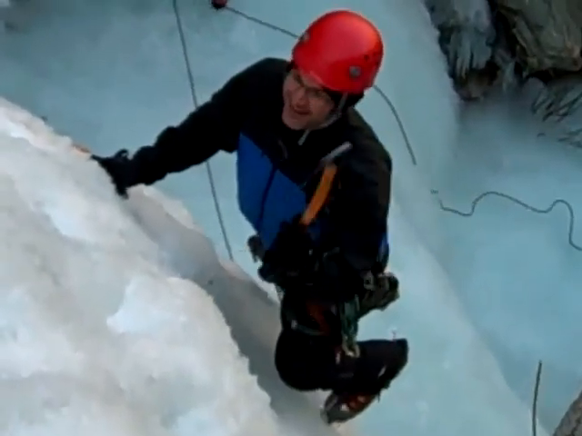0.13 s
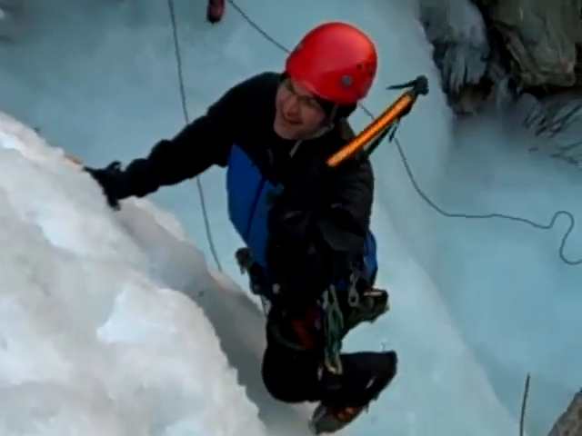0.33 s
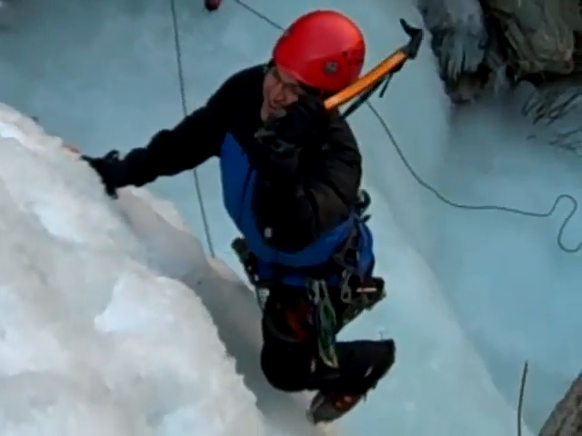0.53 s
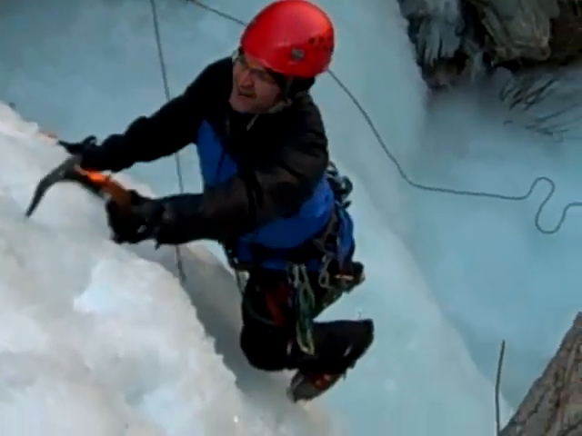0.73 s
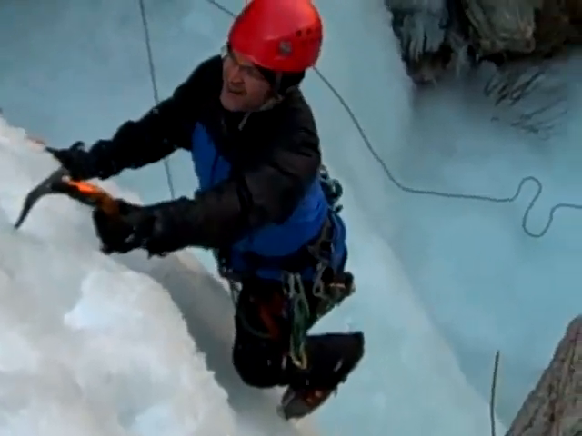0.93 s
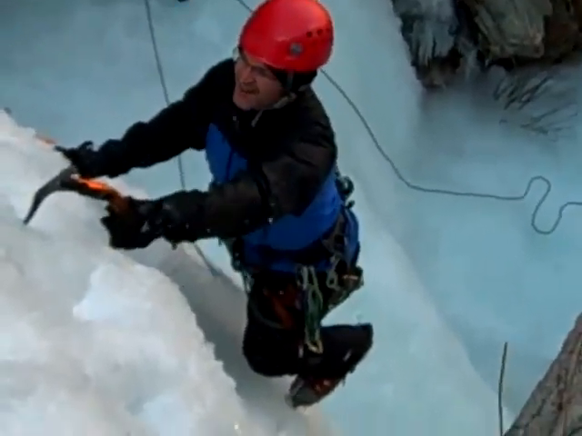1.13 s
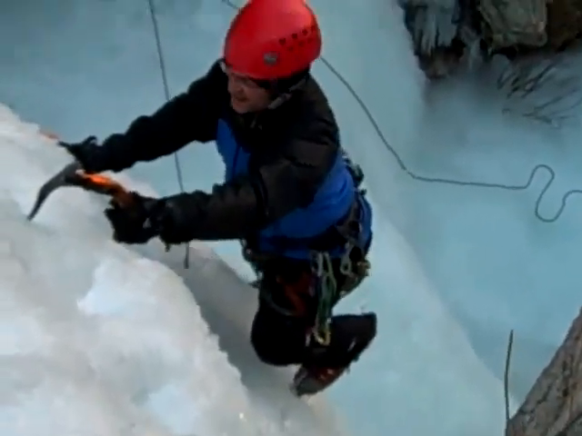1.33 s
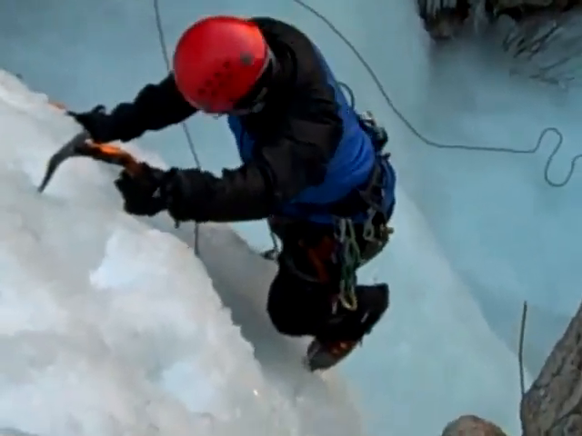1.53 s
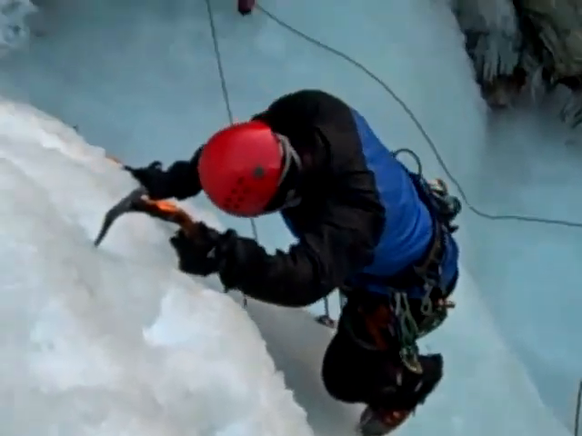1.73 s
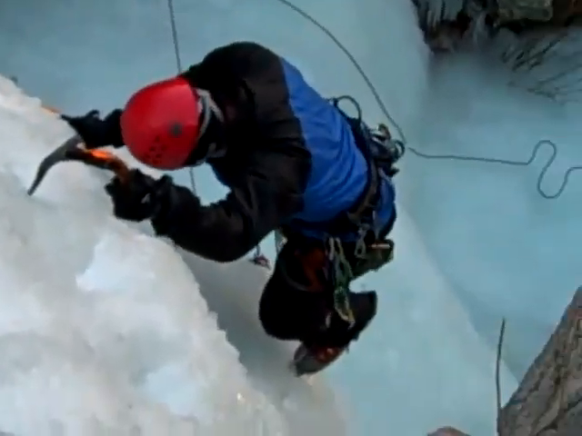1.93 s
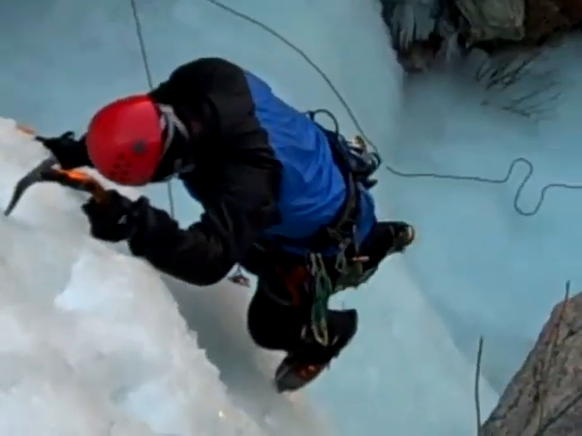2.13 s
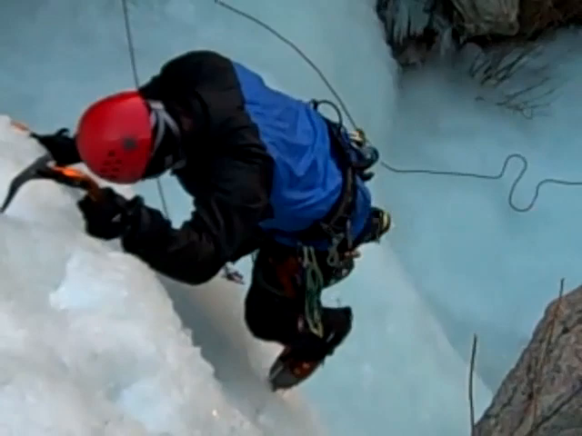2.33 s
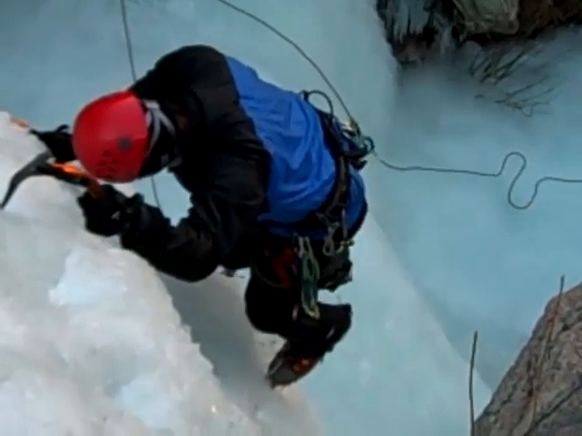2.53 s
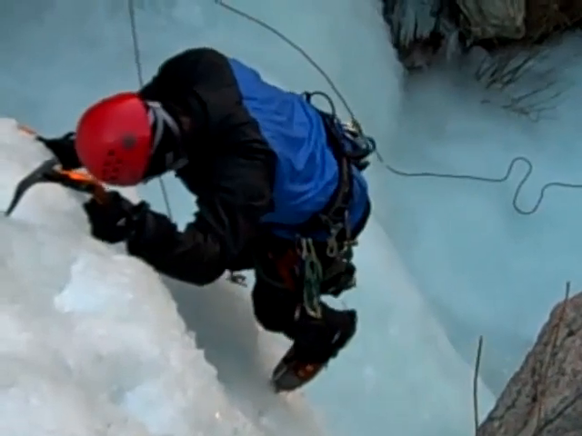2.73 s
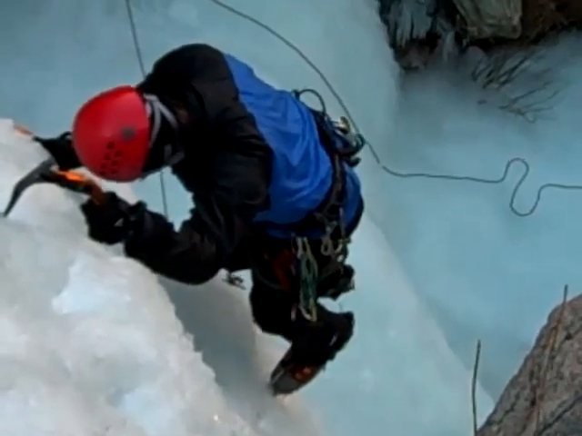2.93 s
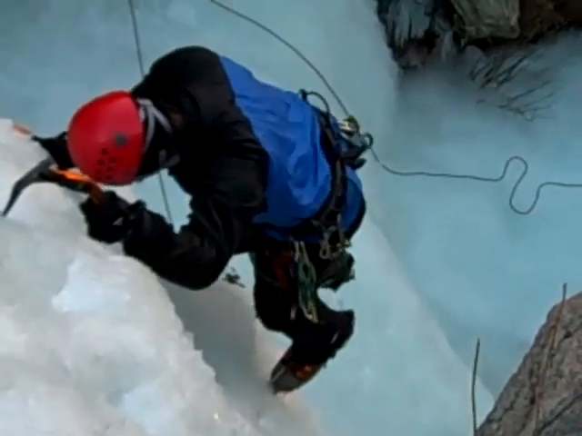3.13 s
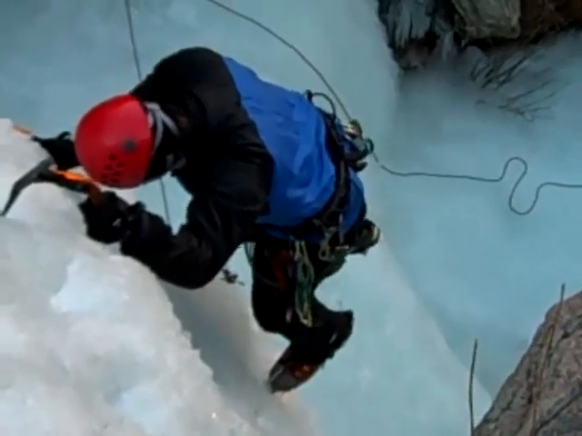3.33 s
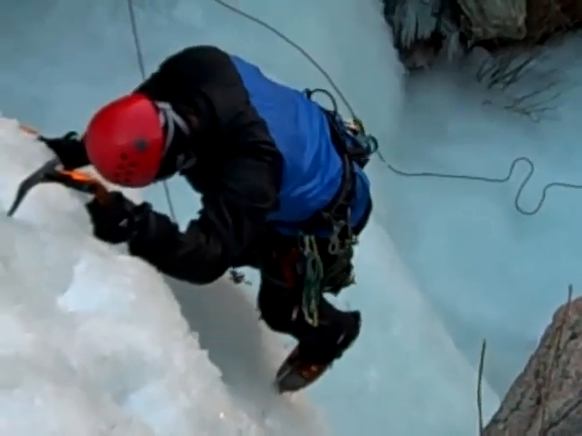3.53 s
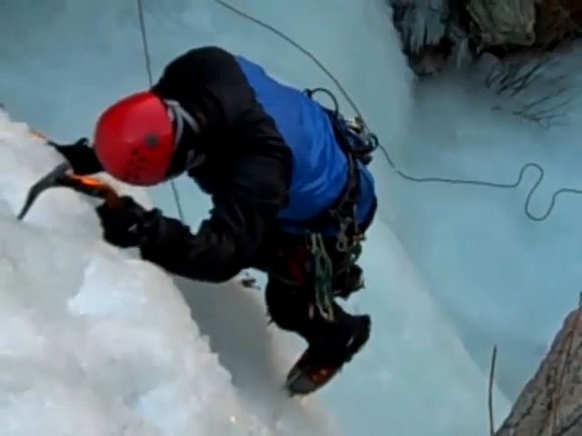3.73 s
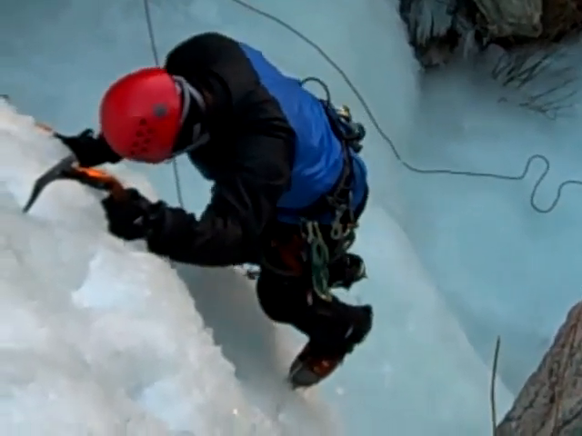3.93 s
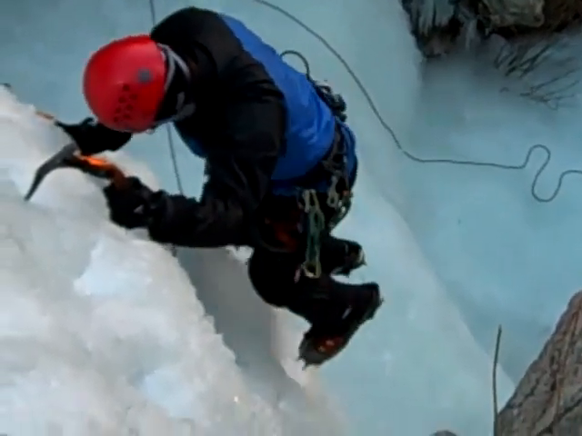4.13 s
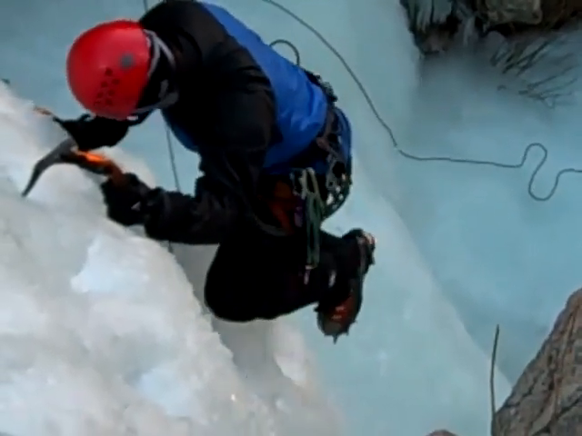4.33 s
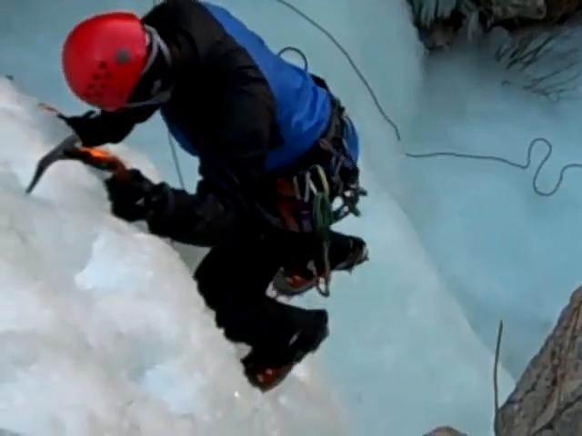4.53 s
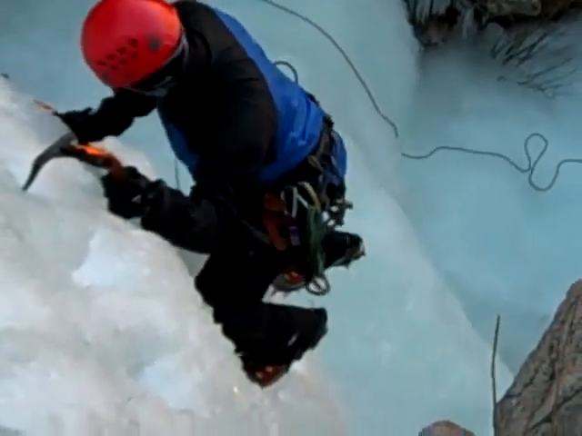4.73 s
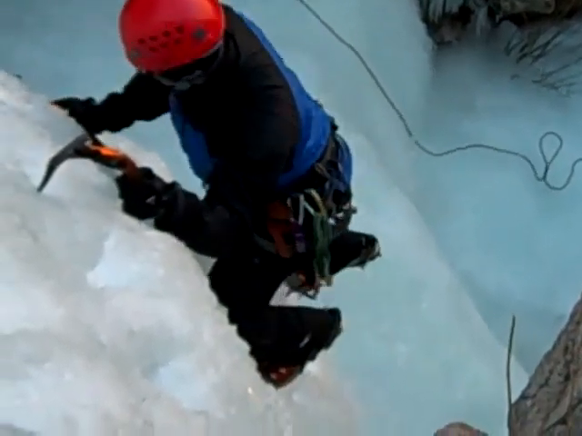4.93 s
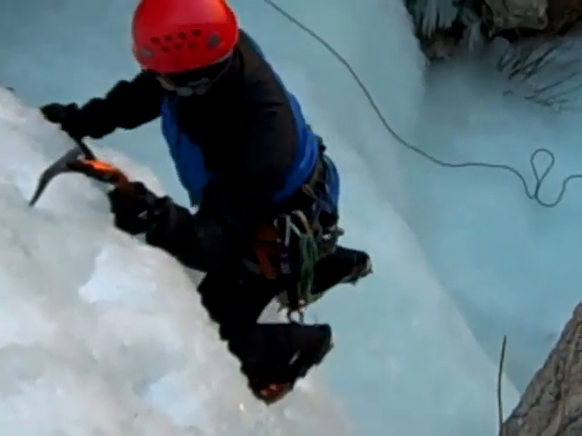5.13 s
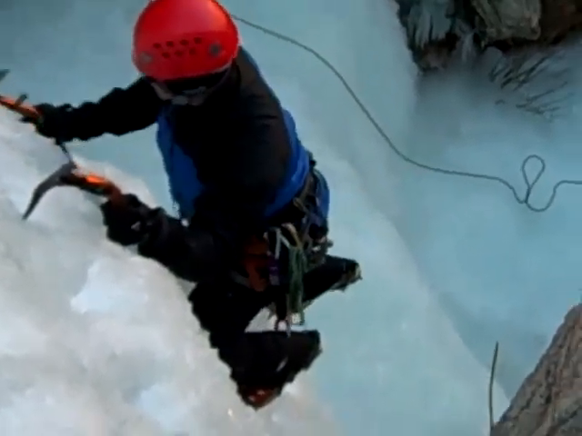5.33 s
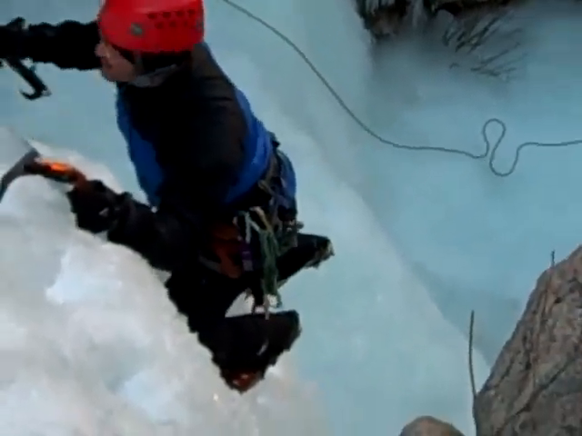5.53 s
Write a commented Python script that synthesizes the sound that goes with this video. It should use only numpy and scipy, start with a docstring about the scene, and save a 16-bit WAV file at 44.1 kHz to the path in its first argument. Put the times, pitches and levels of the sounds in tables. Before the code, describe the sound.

A climber works up a frozen waterfall a few metres below the microphone. A thin steel clink comes first, then an ice axe bites with one sharp, tight crunch. Four crampon kicks follow about a second apart, each crushing ice and loosening small chips. Clothing rustles softly and carabiners jingle once near the end. The gully walls return short echoes over a faint hiss and drip of meltwater.

```python
"""An ice axe bites into a frozen waterfall, then the climber kicks crampons in, a few metres below us.
Each blow crushes ice in a burst of tiny cracks; steel gear clinks, chips fall and clothes rustle.
The gully walls throw the blows back, over the faint hiss and drip of meltwater."""
import sys
import numpy as np
from scipy import signal
from scipy.fft import rfft, irfft
from scipy.io import wavfile

SR = 44100
rng = np.random.default_rng(int(sys.argv[2]) if len(sys.argv) > 2 else 0)


def wrap_up_sound(samples):
    """Save the sound to the file named by the first command line argument, as 16-bit audio."""
    columns = np.atleast_2d(samples).T
    # keep every value between -1 and 1, then stretch to whole-number steps
    tamed = np.clip(columns, -1, 1)
    steps = np.round(tamed * 32767).astype(np.int16)
    wavfile.write(sys.argv[1], SR, steps)


N = 246519
TIME = np.arange(N) / SR

# Crampon kicks. Each row: start in seconds, bite level in dB, rise in seconds, treble in dB,
# level of the boot sinking in, in dB.
KICKS = [(2.6004, -24.5, 0.0034, 2.5, -30), (3.6040, -27, 0.0033, 2, -26.5),
         (4.6925, -28.5, .0105, -3, -56), (5.473, -30.5, 0.0013, -2.5, -44)]
# The tone of ice crunching under a boot. Each row: frequency in Hz, level in dB.
CRUNCH_COLOUR = [(60, -27), (120, -13.5), (200, -9.5), (420, 2.5), (600, -2), (1400, 2.5), (2200, -1),
                 (2700, -2.5), (3600, -1), (6000, -8), (8000, -5), (14000, -5.5), (16000, -4)]


def undb(db):
    """Decibels to gain."""
    return 10 ** (np.asarray(db) / 20)


def unit(x):
    """Scale to rms 1."""
    return x / np.sqrt(np.mean(x ** 2))


def add(track, s, x):
    """Mix x into the track at s seconds."""
    i = max(int(s * SR), 0)
    track[i:i + len(x)] += x[:max(N - i, 0)]


def colour(x, points, bass_db=0, treble_db=0, size=2048):
    """Unit-power EQ through (Hz, dB) points, with a bass and a treble shelf."""
    f = np.arange(size // 2 + 1) * SR / size + 1
    hz, db = np.transpose(points)
    curve_db = np.interp(np.log(f), np.log(hz), db)
    curve_db += bass_db / (1 + (f / 700) ** 3) + treble_db / (1 + (4000 / f) ** 3)
    # Minimum phase keeps attacks sharp: nothing rings ahead of a hit.
    cepstrum = irfft(np.log(unit(undb(curve_db))))
    cepstrum[1:size // 2] *= 2
    cepstrum[size // 2 + 1:] = 0
    impulse = irfft(np.exp(rfft(cepstrum, size)))
    return signal.fftconvolve(x, impulse)[:len(x)]


def crackle(n, rate, spread_db):
    """Tiny cracks of uneven size, about `rate` a second, at rms 1."""
    size = undb(spread_db * np.minimum(rng.exponential(size=n), 5))
    return unit((rng.random(n) < rate / SR) * size * rng.choice([-1, 1], n))


def wander(rate):
    """A random drift around zero, heading for a new value `rate` times a second."""
    knots = rng.standard_normal(int(N / SR * rate) + 2)
    return np.interp(TIME * rate, np.arange(len(knots)), knots)


def ping(hz, cycles, glide=0):
    """One short ring decaying over `cycles` periods; glide bends its pitch upward."""
    t = TIME[:SR // 20]
    age = t * hz / cycles
    bend = 1 + glide * (1 - np.exp(-age / 4))
    return np.sin(2 * np.pi * hz * t * bend) * np.exp(-age) * (1 - np.exp(-6 * age))


def ring(modes, sustain):
    """Struck metal rings in decaying modes; sustain scales their ring time."""
    t = TIME[:SR // 2]
    attack = np.minimum(t / 0.0003, 1)
    out = np.zeros(len(t))
    for hz, db, t60 in modes:
        fade = np.exp(-np.log(1000) * t / (t60 * sustain))
        out += rng.choice([-1, 1]) * undb(db) * np.sin(2 * np.pi * hz * t) * fade
    return attack * out


def crush(blows, points, rate, spread_db):
    """Ice gives way under steel: cracks swell as the point sinks in and die as it stops."""
    out, t = np.zeros(N), TIME[:SR // 5]
    for s, db, rise, decay, bass_db, treble_db in blows:
        force = np.minimum(t / rise, 1) * np.exp(-np.maximum(t - rise, 0) / decay)
        cracks = colour(force * crackle(len(t), rate, spread_db), points, bass_db, treble_db)
        add(out, s, undb(db) * cracks * np.linalg.norm(force) / np.linalg.norm(cracks))
    return out


def meltwater(wash_db=-65.6, bubble_db=-64, bubbles=800, glide=0.039):
    """A bed of running water, with small air bubbles and a few clear drips that rise in pitch."""
    # The tone of the wash. Each row: frequency in Hz, level in dB.
    water_colour = [(25, 17), (60, 5.5), (140, 1.5), (320, 0.5), (430, 5), (600, 1.5), (800, 6.5),
                    (1300, 1.5), (1800, 0), (3000, -15), (6000, -13), (11000, -32), (16000, -27)]
    # The clearest drips. Each row: start in seconds, level in dB, pitch in Hz.
    drips = [(0.495, -39, 1800), (2.057, -46.5, 1340), (4.611, -42, 2450), (5.298, -41.5, 1440)]
    out = undb(wash_db + wander(2.88)) * unit(colour(rng.standard_normal(N), water_colour))
    for when, pitch, size, length in rng.random((bubbles, 4)):
        db = bubble_db + 3.5 * min(-np.log(size), 3.2) - 3 * pitch
        bubble = ping(1500 * 4.5 ** pitch, cycles=4 + 8 * length, glide=glide)
        add(out, when * N / SR, undb(db) * bubble)
    for s, db, hz in drips:
        add(out, s, undb(db) * ping(hz, cycles=6, glide=glide))
    return out


def rustle(still_db=-68.5, cloth_db=-1, flutter_db=3, grain_db=5, grains=700):
    """Cloth and rope rub as the climber shifts; loosened grains of ice tick, each at its own pitch."""
    # Shifts of the body. Each row: crest in seconds, level in dB, half-length in seconds.
    moves = [(0.165, -62, 0.18), (0.67, -66.5, 0.78), (1.804, -65.5, 0.68), (2.462, -65, 0.27),
             (2.75, -62.5, 0.18), (3.701, -56.5, 0.19), (4.26, -59.5, 0.39), (4.67, -58.5, 0.41),
             (5.135, -59.5, 0.16), (5.535, -57, 0.22)]
    # The tone of the cloth. Each row: frequency in Hz, level in dB.
    cloth_colour = [(100, -1.5), (280, -3.5), (420, 6), (1200, 3.5), (1800, 6.5), (3500, 1.5), (6000, -1.5),
                    (9000, -1.5), (15000, -6)]
    swells = [undb(db) * np.exp(-((TIME - s) / length) ** 2) for s, db, length in moves]
    effort = np.sqrt(undb(still_db) ** 2 + sum(swell ** 2 for swell in swells))
    fibres = crackle(N, rate=16000, spread_db=2.4)
    out = effort * undb(cloth_db + flutter_db * wander(70)) * colour(fibres, cloth_colour)
    for when, pitch, size in rng.random((grains, 3)):
        db = grain_db - 6 * pitch + 3.2 * min(-np.log(size), 3)
        grain = ping(1800 * 5 ** pitch, cycles=3 + 5 * pitch)
        add(out, when * N / SR, effort[int(when * N)] * undb(db) * grain)
    return out


def scuffs():
    """Light contacts crush only the surface: a tap stops at once, a scrape drags on."""
    # Boot and tool tapping the ice. Each row: start in seconds, level in dB, treble in dB.
    taps = [(.0400, -47.5, -22), (0.074, -43, -7), (0.153, -47.5, 2), (1.6180, -45, 0), (4.1118, -44.5, 0),
            (4.3515, -47.5, -4), (4.365, -47.5, -6), (5.1216, -48.5, -11), (5.1590, -45.5, 34)]
    # Steel dragging over the ice. Each row: start in seconds, level in dB, treble in dB.
    scrapes = [(1.4230, -62.5, -7), (1.6330, -50.5, 5), (2.8850, -59, -1), (3.404, -54.5, 37),
               (4.1320, -49, -1)]
    # The tone of scuffed ice. Each row: frequency in Hz, level in dB.
    scuff_colour = [(100, -32), (700, 2), (2000, 2.5), (3500, 9), (5500, 4.5), (9000, 4), (16000, -0.5)]
    rise_s, decay_s, bass_db = 0.0011, 0.006, -16
    blows = [(s, db, rise_s, decay_s, bass_db, treble_db) for s, db, treble_db in taps]
    rise_s, decay_s, bass_db = 0.0028, 0.032, 6
    blows += [(s, db, rise_s, decay_s, bass_db, treble_db) for s, db, treble_db in scrapes]
    return crush(blows, scuff_colour, rate=12000, spread_db=1)


def clinks(contacts, modes, tick_db, tick_s):
    """Metal makes contact: a bright tick, then a ring whose close modes beat."""
    out, t = np.zeros(N), TIME[:SR // 2]
    for s, db, sustain in contacts:
        burst = rng.standard_normal(len(t)) * np.exp(-t / tick_s)
        tick = colour(burst, [(1500, -69), (3500, -4), (16000, -10)])
        add(out, s, undb(db) * (ring(modes, sustain) + undb(tick_db) * tick))
    return out


def pick_clinks():
    """The steel pick rings high and thin as it touches gear or ice."""
    # Touches of the pick. Each row: start in seconds, level in dB, ring-time factor.
    touches = [(0.0402, -54, .8), (0.0542, -27, 0.46), (0.058, -45, 0.18), (.9225, -34, 0.54),
               (5.4420, -32.5, 0.13)]
    # The pick's modes. Each row: frequency in Hz, level in dB, seconds to fall 60 dB.
    pick_modes = [(3680, 6, 0.012), (4300, -7, 0.032), (4830, -3, 0.027), (6460, 0, 0.012),
                  (8450, -6.5, .05), (8890, -6, 0.17), (8820, -2, 0.029), (8975, -15, 0.47)]
    return clinks(touches, pick_modes, tick_db=-9.5, tick_s=0.0023)


def gully(x):
    """Rough walls of ice and rock scatter the sound back in a cluster of echoes."""
    # The echo's envelope. Each row: delay in seconds, level in dB.
    echo_shape = [(0, 9.5), (.025, -7), (.042, 1), (.075, -5), (.11, -15), (.18, -25), (.3, -36), (.6, -68)]
    # The tone of the walls. Each row: frequency in Hz, level in dB.
    wall_colour = [(80, 1.5), (300, -7), (550, -4), (900, 0), (1300, -7), (1900, 4), (3500, -3),
                   (7000, 1.5), (15000, -12)]
    t = TIME[:SR * 3 // 5]
    envelope = undb(np.interp(t, *np.transpose(echo_shape)))
    echoes = colour(crackle(len(t), rate=6000, spread_db=1.5) * envelope, wall_colour)
    return signal.fftconvolve(x, echoes / np.linalg.norm(echoes))[:N]


def bumps(decay_cycles=0.2):
    """Boot and knee land in soft, heavily damped thumps; the lower, the longer."""
    # Dull thumps. Each row: start in seconds, level in dB, pitch in Hz.
    thumps = [(0.121, -58.5, 133), (.672, -62, 130), (1.5069, -46, 620), (5.174, -54.5, 249)]
    out, t = np.zeros(N), TIME[:SR // 10]
    for s, db, hz in thumps:
        age = t * hz / decay_cycles
        add(out, s, undb(db) * np.sin(2 * np.pi * hz * t) * age * np.exp(2 - age))
    return out


def chips(gain_db=-3, click_s=0.00028, grit_db=-15, grit_s=0.0065, per_kick=6):
    """A falling chip lands with a click and a little grit; every kick loosens a few small ones."""
    # The largest chips landing. Each row: start in seconds, level in dB, centre frequency in Hz.
    large_chips = [(.4775, -38.5, 6440), (1.011, -30.5, 9200), (2.0285, -45.5, 3140), (2.392, -34, 7960),
                   (2.688, -33, 9000), (2.8922, -40, 9500), (3.5500, -40.5, 3000), (3.758, -31, 5440),
                   (4.236, -37, 3200), (4.734, -27, 7860), (5.0316, -42.5, 11000)]
    flight_s, flight_range_s = 0.13, 0.18
    debris_db, scatter_db, debris_hz = -17, 1.5, 11000
    out, t, landings = np.zeros(N), TIME[:SR // 30], list(large_chips)
    for s, bite_db, *_ in KICKS:
        for when, size in rng.random((per_kick, 2)):
            db = bite_db + debris_db + scatter_db * (2 * size - 1)
            landings.append((s + flight_s + when * flight_range_s, db, debris_hz))
    envelope = np.exp(-t / click_s) + undb(grit_db) * np.exp(-t / grit_s)
    for s, db, hz in landings:
        click = rng.standard_normal(len(t)) * envelope
        add(out, s, undb(db + gain_db) * colour(click, [(hz / 4, -14), (hz, 0), (hz * 3, -15)]))
    return out


def axe_bites():
    """The pick drives into the ice with a tight, dense crunch."""
    # Bites of the pick. Each row: start in seconds, level in dB, rise and decay in seconds,
    # bass and treble in dB.
    bites = [(.9138, -26, 0.0014, 0.012, -7, -7), (.9218, -17, 0.0014, 0.0047, 4.5, -0.5),
             (5.4418, -40, 0.00066, 0.011, -6, -10)]
    # The tone of the bite. Each row: frequency in Hz, level in dB.
    bite_colour = [(30, -8), (80, -3), (170, -13), (280, -3), (410, -1), (600, -11), (1150, 1), (1600, -7),
                   (2100, -2), (3400, 0), (4700, -2), (6000, -9), (8500, -3), (12000, -10), (16000, -15)]
    return crush(bites, bite_colour, rate=16000, spread_db=2.5)


def knocks():
    """Hard ice shakes the axe or a crampon into a short, choked ring."""
    # Hard contacts. Each row: start in seconds, level in dB, ring-time factor.
    contacts = [(0.915, -28, 0.75), (0.9221, -37, 2.3), (3.6182, -21.5, 0.24), (4.112, -42, 0.63),
                (5.4472, -45, 0.62)]
    # The gripped tool's modes. Each row: frequency in Hz, level in dB, seconds to fall 60 dB.
    tool_modes = [(394, -17, 0.025), (998, -14.5, 0.081), (1290, -29, .025), (2000, -5, 0.013),
                  (2400, -2.5, 0.028), (2910, -2, 0.027), (3610, 6, 0.015), (4120, -7.5, 0.093)]
    out = np.zeros(N)
    for s, db, sustain in contacts:
        add(out, s, undb(db) * ring(tool_modes, sustain))
    return out


def spray(blows, spray_db=-14, fall_s=0.026):
    """Crumbs of ice fly from each blow and patter down the face, trailing its energy."""
    t = TIME[:SR // 3]
    fall = t * np.exp(-t / fall_s)
    power = signal.fftconvolve(blows ** 2, fall / fall.sum())[:N]
    patter = colour(crackle(N, rate=3900, spread_db=4), CRUNCH_COLOUR, bass_db=-12, treble_db=-0.5)
    return undb(spray_db) * np.sqrt(np.abs(power)) * patter


def crampon_kicks():
    """The front points bite, the boot sinks in, longer and duller, and later settles under weight."""
    # Dull crunches of a settling boot. Each row: start in seconds, level in dB, treble in dB.
    settles = [(4.1470, -43.5, -38), (4.7375, -46, -12), (4.7485, -40, -8), (4.7807, -43, -9),
               (5.458, -38.5, -20), (5.5310, -37.5, -16)]
    settle_shape = (0.0026, 0.003, -2)  # rise and decay in seconds, bass in dB
    sink_shape = (0.0028, 0.0093, 6)  # likewise
    bite_decay_s, bite_bass_db, sink_lag_s = 0.004, 1, 0.0055
    blows = [(s, db, *settle_shape, treble_db) for s, db, treble_db in settles]
    for s, db, rise, treble_db, sink_db in KICKS:
        blows.append((s, db, rise, bite_decay_s, bite_bass_db, treble_db))
        blows.append((s + rise + sink_lag_s, sink_db, *sink_shape, treble_db - 2))
    return crush(blows, CRUNCH_COLOUR, rate=14000, spread_db=3)


def splinters():
    """Thin shards break off, each with one tiny glassy ring."""
    # Tinkling shards. Each row: start in seconds, level in dB, pitch in Hz.
    shards = [(2.630, -31, 11700), (2.632, -31, 13900)]
    out = np.zeros(N)
    for s, db, hz in shards:
        add(out, s, undb(db) * ping(hz, cycles=45))
    return out


def carabiners():
    """Carabiners touch on the harness with a small, bright jingle."""
    # Their touches. Each row: start in seconds, level in dB, ring-time factor.
    jingles = [(4.5148, -43, 0.29), (4.5198, -30, 0.38)]
    # A carabiner's modes. Each row: frequency in Hz, level in dB, seconds to fall 60 dB.
    carabiner_modes = [(6240, -15, .11), (8700, 0, .045), (8830, -9, .04), (10000, -15, .02)]
    return clinks(jingles, carabiner_modes, tick_db=-8, tick_s=0.00037)


def scene(axe_echo_db=-18, feet_echo_db=-4, small_echo_db=-14, axe_spray_db=-7):
    """The axe is in plain view; the feet are further down, so more of their sound comes by the walls."""
    axe = axe_bites() + knocks()
    feet = crampon_kicks()
    steel = pick_clinks() + carabiners()
    small = scuffs() + steel + chips() + splinters() + bumps()
    echo = gully(undb(axe_echo_db) * axe + undb(feet_echo_db) * feet + undb(small_echo_db) * small)
    crumbs = spray(feet + undb(axe_spray_db) * axe)
    return np.tile(axe + feet + small + echo + crumbs + rustle() + meltwater(), (2, 1))


def record(dry, top_hz=15900):
    """A steep low-pass takes the very top off both channels."""
    return signal.sosfilt(signal.ellip(10, 0.2, 70, top_hz, fs=SR, output="sos"), dry)


dry = scene()
out = record(dry)
wrap_up_sound(out)
```